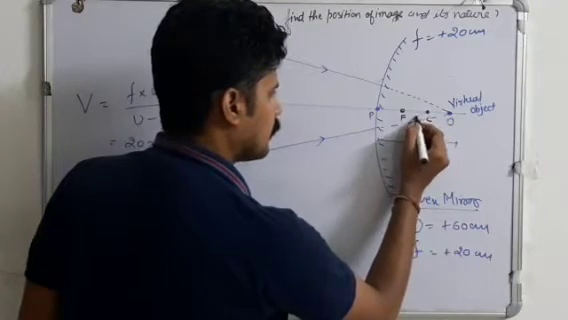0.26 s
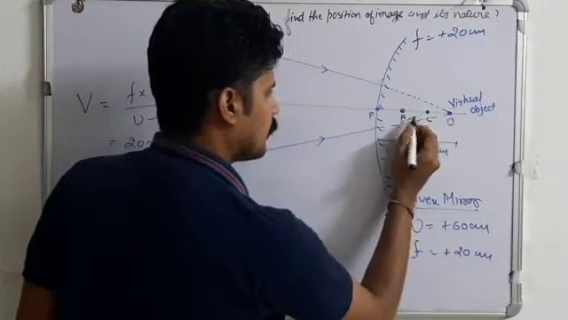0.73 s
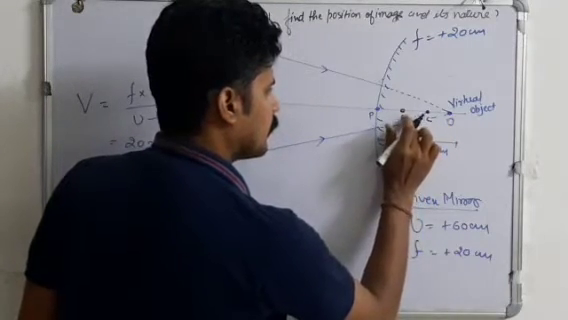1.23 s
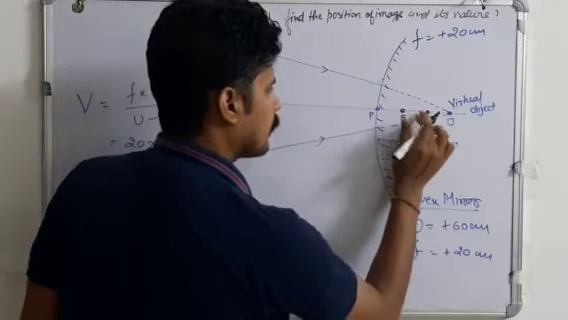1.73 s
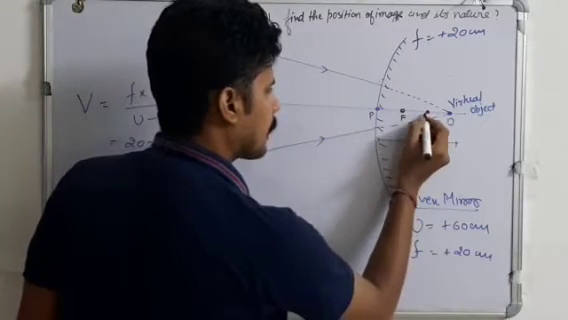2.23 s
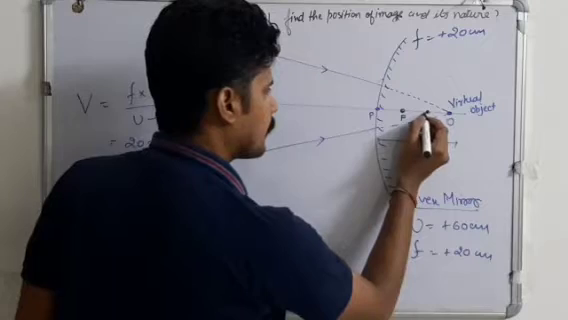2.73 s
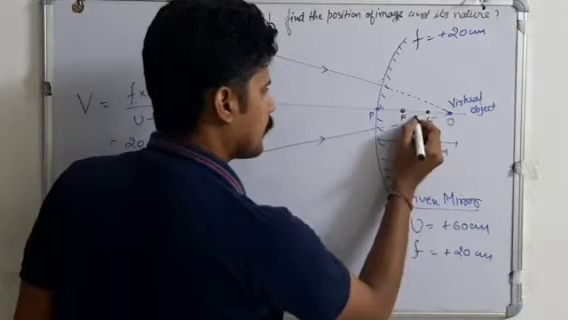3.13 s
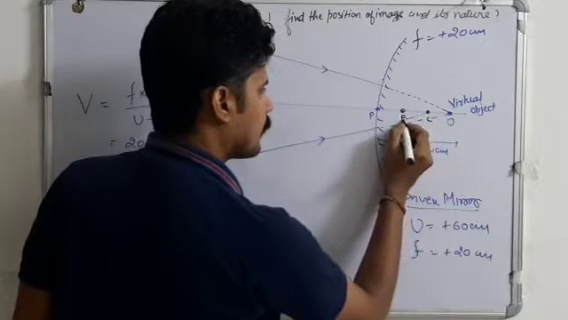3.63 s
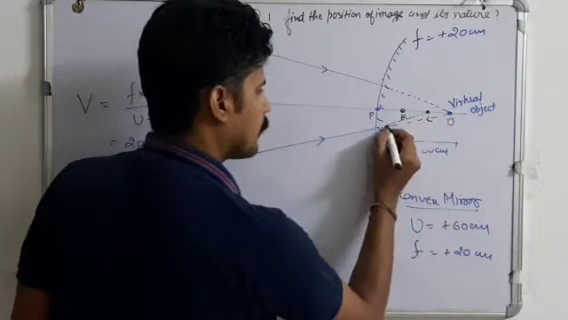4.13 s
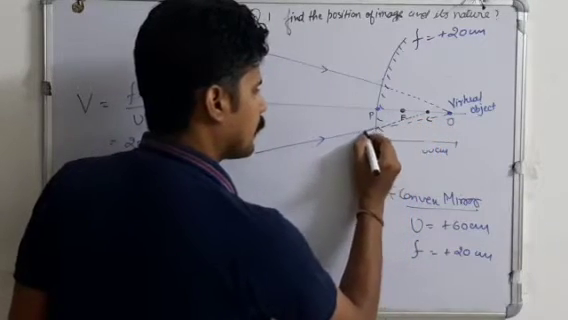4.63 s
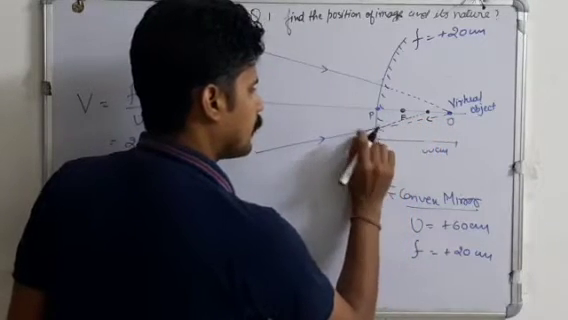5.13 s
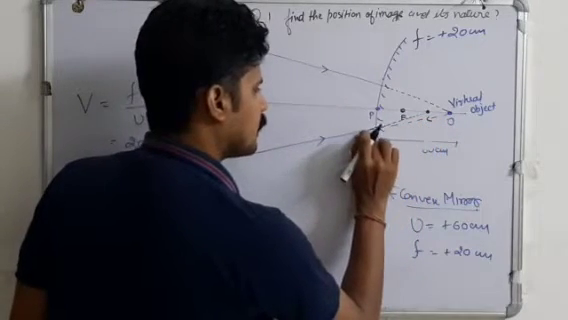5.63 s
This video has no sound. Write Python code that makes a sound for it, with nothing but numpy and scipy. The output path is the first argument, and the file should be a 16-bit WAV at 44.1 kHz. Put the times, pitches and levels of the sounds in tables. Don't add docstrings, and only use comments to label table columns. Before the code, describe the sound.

Low-level indoor background with no talking and no clear marker squeak. Transformer hum, a distant generator and a small motor blend into a continuous, gently pulsing drone above rumbling air. Passing traffic swells it softly, strongest a little after the middle; barely audible cloth rustles come and go. One muffled thud sounds near two and a third seconds. Small stereo device microphones add thin high hiss.

```python
import sys
import numpy as np
from scipy import signal
from scipy.io import wavfile
from scipy.ndimage import uniform_filter1d

SR = 44100
rng = np.random.default_rng(int(sys.argv[2]) if len(sys.argv) > 2 else 0)


def digitize_waveform(pressure):
    field = np.atleast_2d(pressure).T
    bounded = np.clip(field, -1, 1)
    quanta = np.round(bounded * 32767).astype(np.int16)
    wavfile.write(sys.argv[1], SR, quanta)


def nominal_scale(level):
    x = np.asarray(level, float) / 20
    return 10 ** x


N = 258505
T_S = np.arange(N) / SR
FFT_SIZE, HOP = 4096, 1024
GRID_HZ = np.fft.rfftfreq(FFT_SIZE, 1 / SR)
GRID_S = np.arange(N // HOP + 5) * HOP / SR


def evened(x):
    return x / np.sqrt(np.mean(x ** 2) + 1e-20)


def read(points, hz):
    f, value = np.transpose(points)
    return np.interp(np.log(hz + 1), np.log(f + 1), value)


def steady(points):
    return read(points, GRID_HZ)[:, None] + 0 * GRID_S


def bumps(rows, t):
    return sum(db * np.exp(-.5 * ((t - s) / half_s) ** 2) for s, db, half_s in rows)


def drift(rate_hz):
    f = np.geomspace(rate_hz / 10, rate_hz, 12)[:, None]
    t = np.arange(0, N / SR + .02, .01)
    sines = np.sin(2 * np.pi * (f * t + rng.random(f.shape)))
    slow = (sines / np.sqrt(f)).sum(0)
    return np.interp(T_S, t, evened(slow))


def partly_alike(left, other, same):
    return np.array([left, same * left + np.sqrt(1 - same ** 2) * other])


def noise(db_field, same):
    a, b, c, d = rng.standard_normal((4, *db_field.shape))
    same = np.clip(same, -1, 1)[:, None]
    z = partly_alike(a + 1j * b, c + 1j * d, same) * nominal_scale(db_field)
    sound = signal.istft(z, nperseg=FFT_SIZE, noverlap=FFT_SIZE - HOP)[1]
    return evened(sound[:, :N])


# f/Hz, density/dB per Hz
HISS_COLOUR = [(3000, -35), (5000, -13), (8500, -13.5), (9800, -12), (11800, -3), (12950, -2), (13150, 1.5),
               (14300, 2.5), (15800, 4)]


def port_hiss():
    hiss_db = -78 + 5.0
    return nominal_scale(hiss_db) * noise(steady(HISS_COLOUR), 0 * GRID_HZ)


# f/Hz, likeness/-1..1
PORT_LIKENESS = [(25, 0.53), (50, 0.98), (89, 0.67), (130, 0.94), (230, 0.87), (320, .66), (600, 0.4),
                 (720, 0.027), (1000, -0.26), (1550, -0.41), (2100, 0.13), (4000, -0.045)]


def likeness(hz):
    return read(PORT_LIKENESS, hz)


# nearest t/s, lift/dB, half length/s
PASSES = [
    (1.4, 3, .3),
    (2.4, 3.0, .4),
    (3.4, 4, .5),
    (5.1, 2, .4),
]
# t/s, lift/dB, half length/s
RUSTLES = [
    (.95, 1, .15),
    (3.1, 1.5, .2),
    (4.95, 1.5, .2),
    (5.55, 1.5, .25),
]


def swells(hz, gusts):
    def around(centre_hz, log_width):
        return np.exp(-(np.log((hz + 1) / centre_hz) / log_width) ** 2)[:, None]

    traffic_db = bumps(PASSES, GRID_S) - 1.5
    deep = around(58, 0.35) * (0.82 * traffic_db + gusts[0])
    low = around(150, 0.82) * (traffic_db + gusts[1])
    rustle = around(3500, 1.0) * bumps(RUSTLES, GRID_S)
    return deep + low + rustle


# f/Hz, density/dB per Hz
AIR_COLOUR = [(25, -29), (36, -21), (48, -6.5), (66, -2.5), (80, -8.5), (104, -10.5), (130, -4),
              (212, -5.5), (255, -2.5), (320, -9.5), (600, -10), (720, -14), (1130, -19), (1580, -19.5),
              (1800, -28), (2500, -35.5), (5000, -46), (8500, -61.5)]


def air(gusts):
    air_db, ripple_db, patch_db = -51.5, 1.6, 1.2
    ripple = evened(uniform_filter1d(rng.standard_normal(len(GRID_HZ)), size=2))
    ripple *= np.clip(GRID_HZ / 400 - 1.2, 0, 1) * np.exp(-GRID_HZ / 2500)
    patches = rng.standard_normal((len(GRID_HZ), len(GRID_S)))
    patches = uniform_filter1d(patches, size=12, axis=0)
    patches = evened(uniform_filter1d(patches, size=8, axis=1))
    colour_db = (read(AIR_COLOUR, GRID_HZ) + ripple_db * ripple)[:, None]
    field_db = colour_db + swells(GRID_HZ, gusts) + patch_db * patches
    return nominal_scale(air_db) * noise(field_db, likeness(GRID_HZ))


# f/Hz, width/Hz, rms level/dB
ROOM_MODES = [(63.77, 1.5, -65.5), (117.7, 13, -63), (144.2, 8, -64.5), (296.1, 0.4, -70.5),
              (460, 7, -69.5), (842, 14, -75.5), (1222, 4.1, -81.5), (1655, 9.2, -85.5), (1700, 8.2, -89.5),
              (2050, 97, -82)]


def room_modes(gusts):
    out = np.zeros((2, N))
    a, b = rng.standard_normal((2, N))
    for hz, width_hz, db in ROOM_MODES:
        r = np.exp(-np.pi * width_hz / SR)
        turn = np.exp(2j * np.pi * hz * T_S)
        same = np.clip(likeness(hz) + .045, -1, 1)
        slow = partly_alike(a, b, same) * turn.conj()
        for _ in range(2):
            slow = signal.lfilter([1 - r], [1, -r], slow)
        swell_db = np.interp(T_S, GRID_S, swells(np.array([hz]), gusts)[0])
        out += nominal_scale(db + swell_db) * evened((slow * turn).real)
    return out


# t/s, peak level/dB, half length/s
THUD = (2.345, -48, .055)
# f/Hz, density/dB per Hz
THUD_COLOUR = [(60, -24), (110, -7), (160, -1.5), (300, -3.5), (700, -16.5), (1800, -29), (4000, -55),
               (16000, -74.5)]
# f/Hz, peak level/dB
THUD_RING = [(117, -53), (146, -46.5), (245, -52)]


def thud():
    s, db, half_s = THUD
    t = T_S - s
    ring = sum(nominal_scale(ring_db) * np.cos(2 * np.pi * hz * (t + .024) + np.pi) for hz, ring_db in THUD_RING)
    puff = nominal_scale(db) * noise(steady(THUD_COLOUR), likeness(GRID_HZ))
    return np.exp(-.5 * (t / half_s) ** 2) * (puff + ring)


def fan_throbbed_tones(rows, base_hz, throb, wander_rad, waver_db, locked=False):
    fan_hz, fan_peak_s = 1.68, 1.92
    weaker_echo = 0.87
    out = np.zeros((2, N))
    side = np.array([[.5], [-.5]])
    fan = np.exp(-2j * np.pi * fan_hz * (T_S - fan_peak_s))
    loudest_db = max(row[1] for row in rows)
    for k, db, pan_db, lead_rad in rows:
        start, lag = 2 * np.pi * rng.random(2)
        if locked:
            start = np.pi * (1 + round(k) % 2 / 2)
        echo = fan
        if db != loudest_db:
            echo = weaker_echo * fan * np.exp(1j * lag)
        phase = 2 * np.pi * round(k) * base_hz * T_S + start + wander_rad * drift(2.5)
        tone = nominal_scale(db + waver_db * drift(2.5)) * np.exp(1j * phase) * (1 + throb * echo)
        ports = nominal_scale(side * pan_db) * np.exp(1j * side * lead_rad)
        out += np.sqrt(2) * (ports * tone).real
    return out


# multiple, rms level/dB, left-right/dB, left lead/rad
DRONE = [(1, -60, 1.6, -.1)]
# t/s, level/dB
DRONE_LEVEL = [(0, 0), (.8, -3.5), (1.25, 0), (1.85, -10.5), (2.3, -5), (2.9, -0.5), (3.3, -1.5), (4.7, 3),
               (5.2, -1), (5.6, 4), (5.86, 1)]


def drone():
    tone = fan_throbbed_tones(DRONE, 50.6, throb=.2, wander_rad=0.4, waver_db=0.7)
    return tone * nominal_scale(np.interp(T_S, *np.transpose(DRONE_LEVEL)))


# shaft order, rms level/dB, left-right/dB, left lead/rad
MOTOR = [(1, -81, 2, -0.092), (4, -73, 6.5, 1), (5, -65.5, 4, -0.47), (6, -65, -3.5, -0.17),
         (12, -71.5, 3.5, 0.23)]


def motor():
    shaft_hz = 23.38
    return fan_throbbed_tones(MOTOR, shaft_hz, throb=0.44, wander_rad=0.36, waver_db=2.5)


# order of the engine cycle, rms level/dB, left-right/dB, left lead/rad
ORDERS = [(9, -65, 0.4, -0.1), (14, -66, -3.7, 0.2), (15, -63, 4.0, -0.1), (17, -69, 5.1, -0.5),
          (18, -60, 1.7, -0.0), (19, -57, -1.3, 0.2), (20, -63, 6.4, 0.1), (21, -64, 1.2, 0.5),
          (23, -68, -5.2, 0.4), (26, -72, 3.2, -0.0), (27, -71, -5.5, -0.5), (30, -72, 1.7, -0.3),
          (33, -72, -1.3, 0.3), (34, -64, -0.6, 0.1), (37, -71, -0.4, 0.6), (41, -70, -5.7, 0.5),
          (44, -72, 7.1, 0.2), (45, -67, 4.2, -3.1), (47, -71, -7.3, 1.9), (49, -68, 1.4, 0.9),
          (51, -73, -1.3, 1.4), (55, -77, -3.5, -1.5), (59, -75, 4.8, 2.0), (66, -77, 0.2, 1.6),
          (74, -78, 0.9, -2.6), (77, -78, 2.6, 2.8), (78, -78, 7.4, -2.8), (81, -80, 0.4, 2.6),
          (82, -76, -1.3, 2.7)]
BROAD_ORDERS = [(40, -69.5, -0.5, 0), (48, -69.5, 2, 1.7), (56, -75, 3, 3)]


def generator():
    cycle_hz = 12.497
    orders = ORDERS + BROAD_ORDERS
    return nominal_scale(-2.0) * fan_throbbed_tones(orders, cycle_hz, throb=.55, wander_rad=.5, waver_db=1.5)


# multiple of twice the mains, rms level/dB, left-right/dB, left lead/rad
HUM = [(1, -69, -3.8, -0.1), (2, -47, -0.6, 0.1), (3, -61, -6.8, 1.4), (4, -53, -1.3, 0.3),
       (6, -74, 7.8, 0.4), (7, -78, -6.6, 2.3), (8, -81, 1.9, 3.1), (9, -75, -1.2, 0.9),
       (10, -75, -2.6, -1.5), (11, -86, 4.8, -0.4)]


def hum():
    twice_mains_hz = 99.875
    return fan_throbbed_tones(HUM, twice_mains_hz, throb=.19, wander_rad=0.063, waver_db=.5, locked=True)


def scene():
    gust_db, gust_hz = 1.5, 3.0
    gusts = [gust_db * np.interp(GRID_S, T_S, drift(gust_hz)) for _ in range(2)]
    background = air(gusts) + room_modes(gusts) + thud()
    return background + drone() + motor() + generator() + hum()


def gain_control():
    held_db, release_s, release_span_s, creep_db_per_s = -2.5, .72, 0.17, 0.09
    held = np.clip(.5 - (T_S - release_s) / release_span_s, 0, 1)
    return nominal_scale(held_db * held + creep_db_per_s * (T_S - T_S.mean()))


def soft_edges():
    fade_in_s, fade_out_s = .0015, .002
    ramp = np.minimum(T_S / fade_in_s, (T_S[-1] - T_S) / fade_out_s)
    return np.sin(np.pi / 2 * np.clip(ramp, 0, 1)) ** 2


def roll_off(x):
    return signal.sosfilt(signal.butter(12, 15745, fs=SR, output="sos"), x)


def record(dry):
    mix = (dry + port_hiss()) * gain_control() * soft_edges()
    return roll_off(mix)


dry = scene()
out = record(dry)
digitize_waveform(out)
```